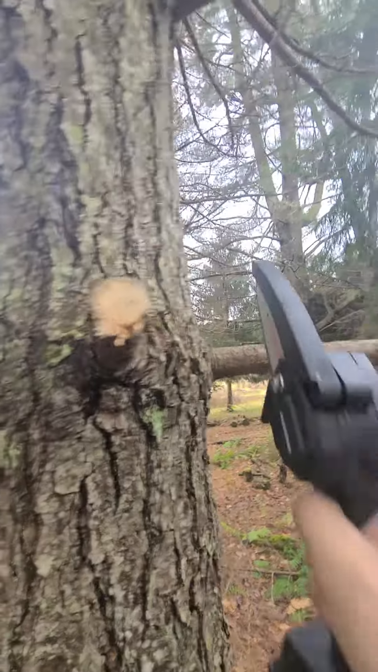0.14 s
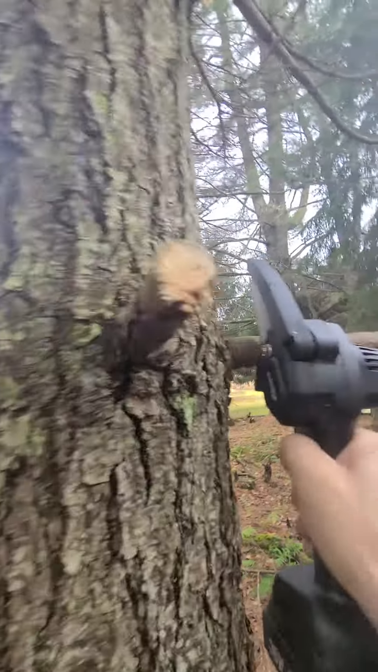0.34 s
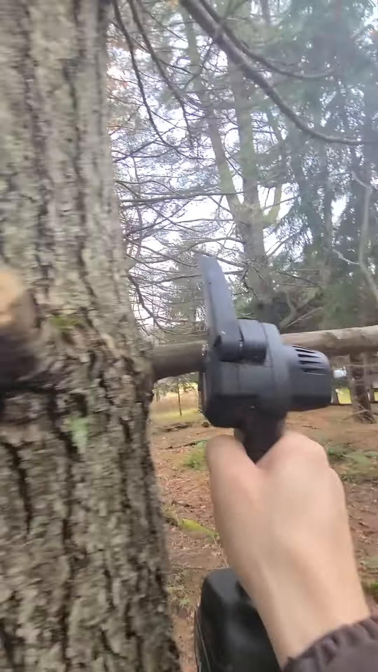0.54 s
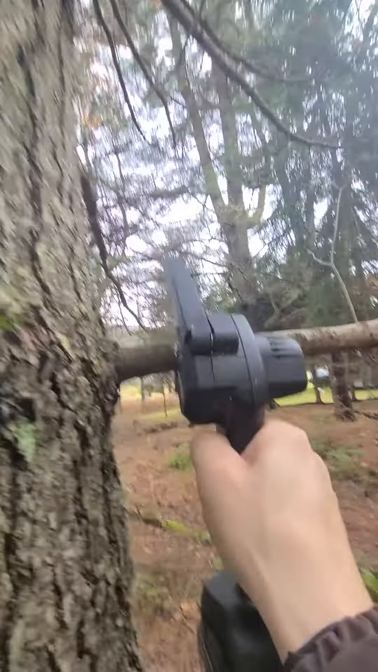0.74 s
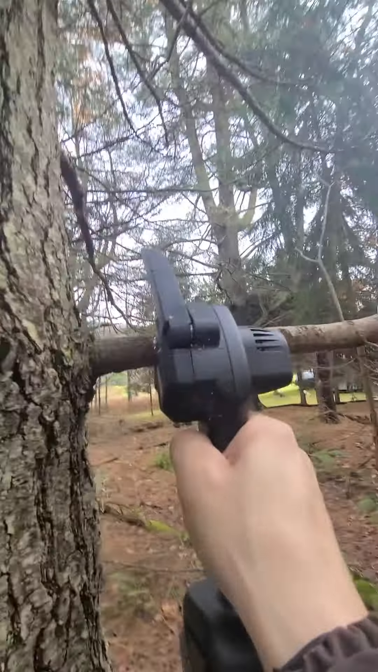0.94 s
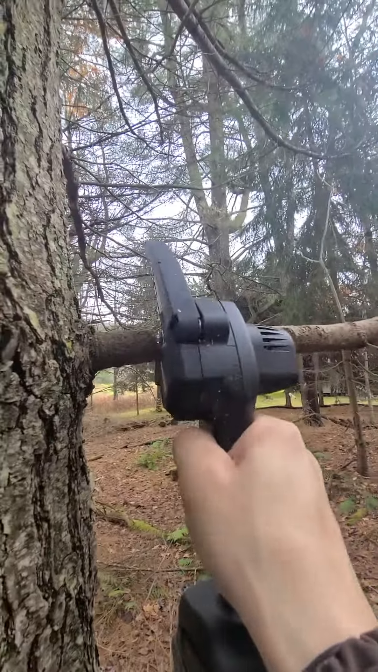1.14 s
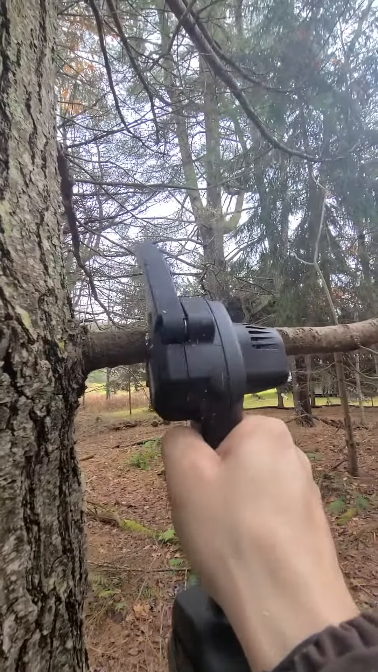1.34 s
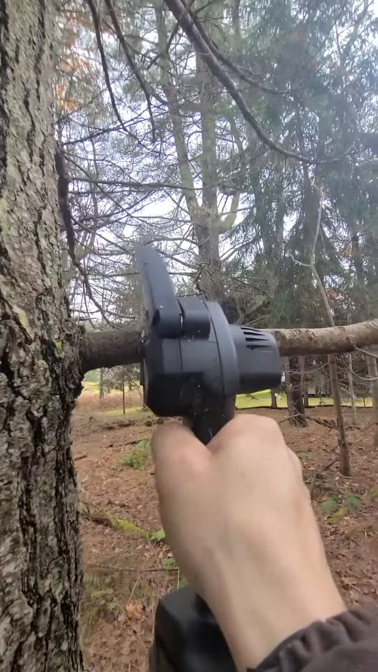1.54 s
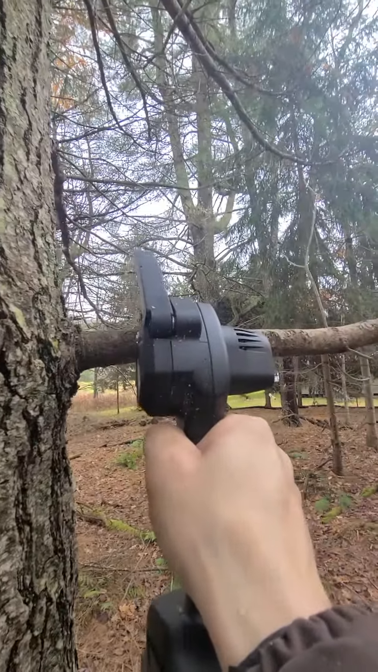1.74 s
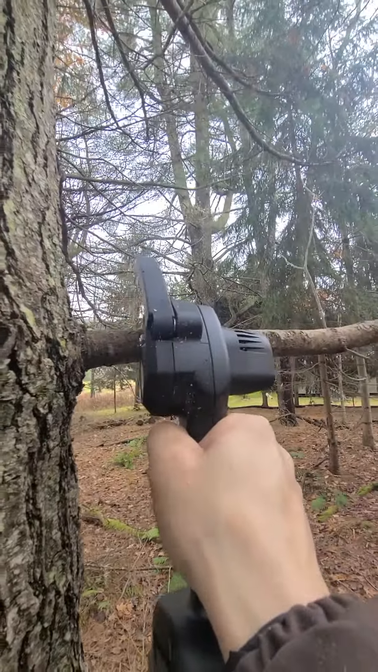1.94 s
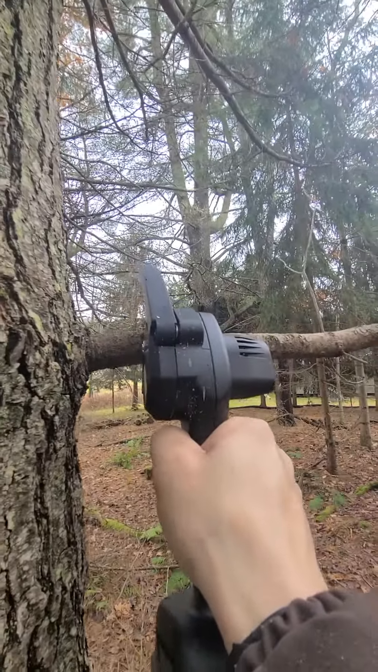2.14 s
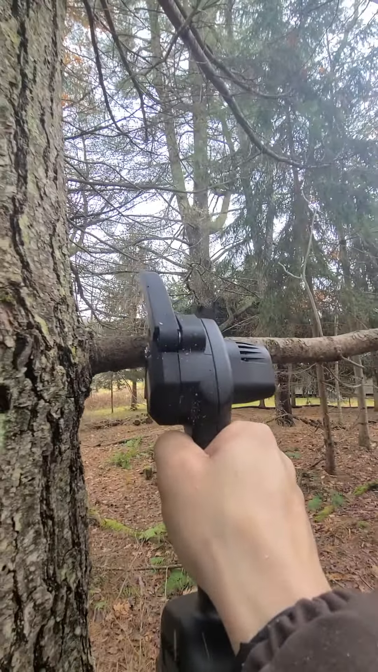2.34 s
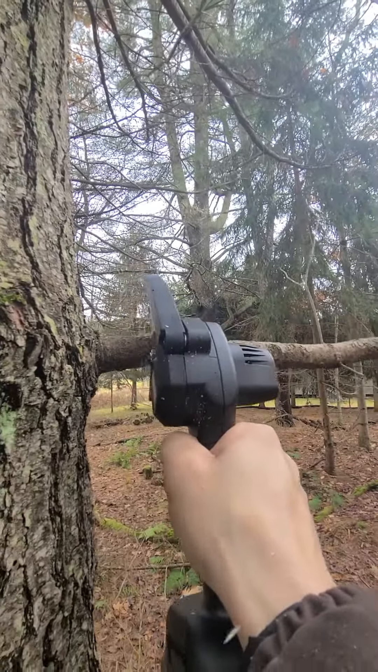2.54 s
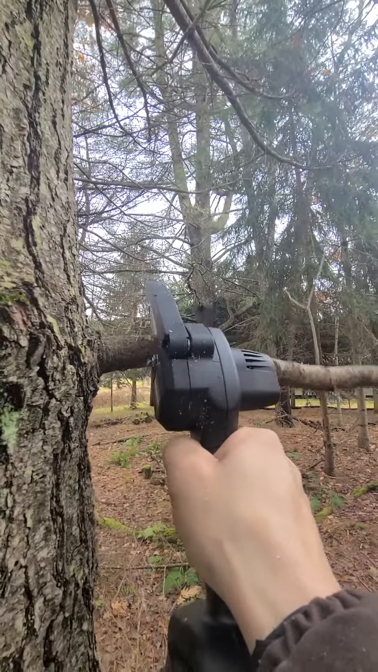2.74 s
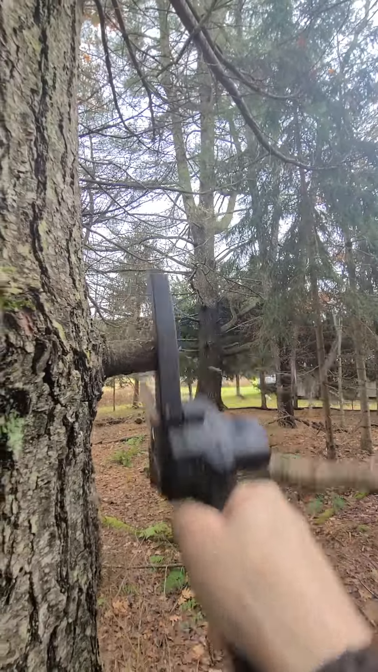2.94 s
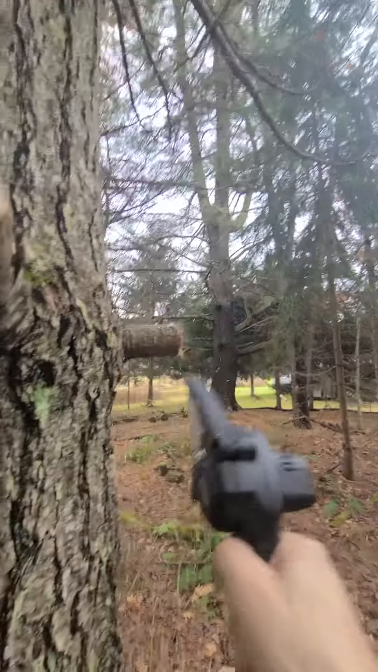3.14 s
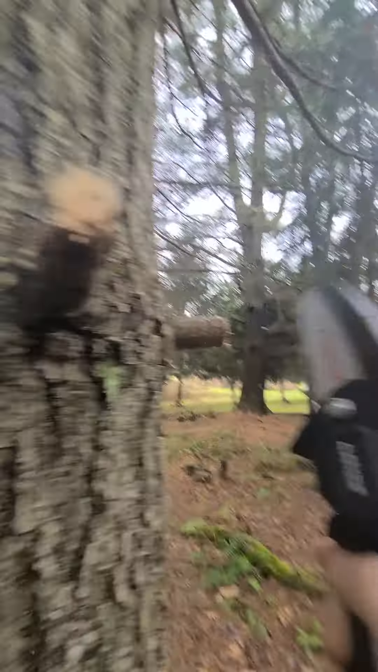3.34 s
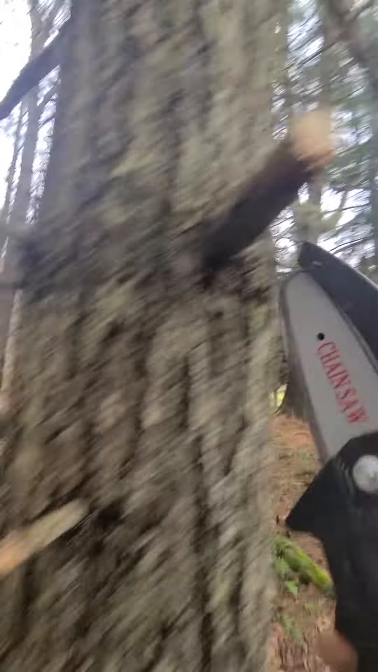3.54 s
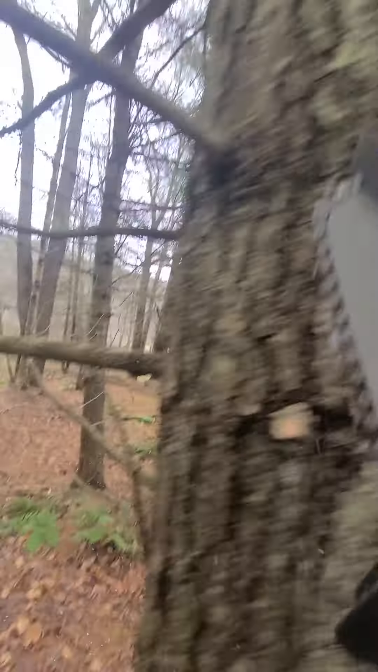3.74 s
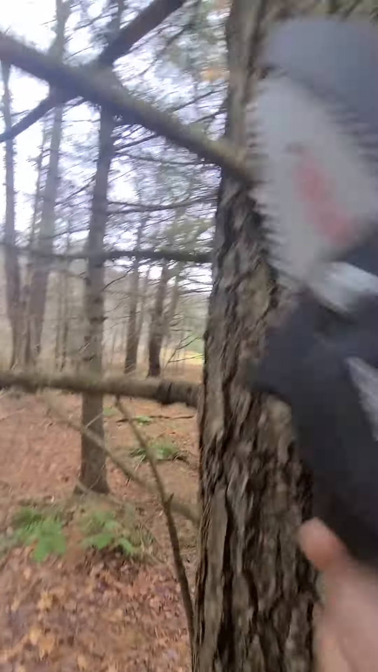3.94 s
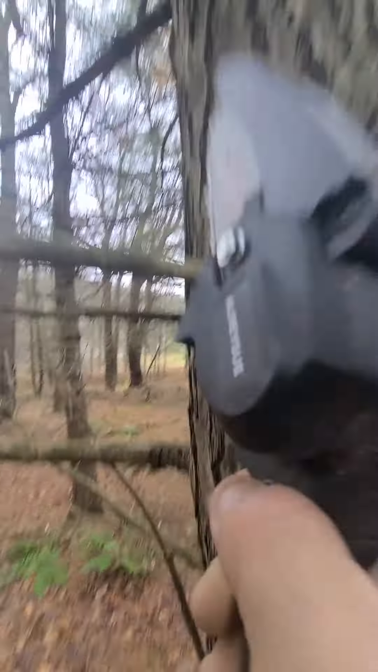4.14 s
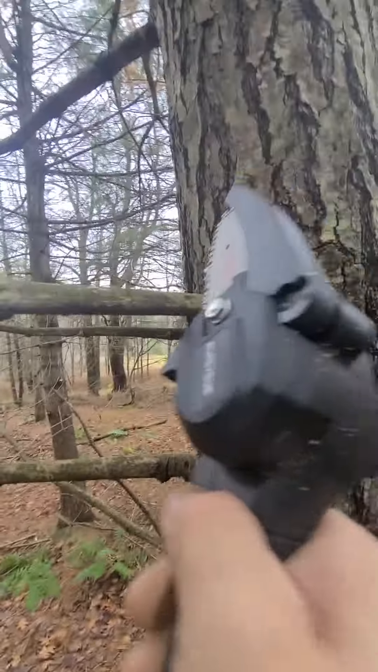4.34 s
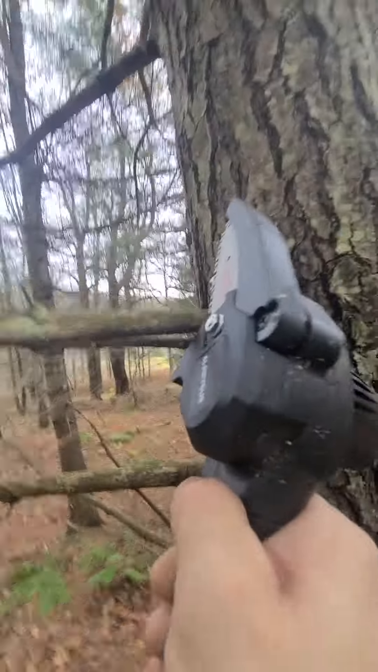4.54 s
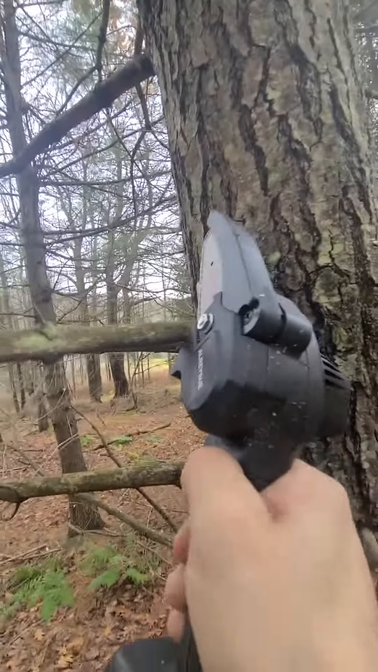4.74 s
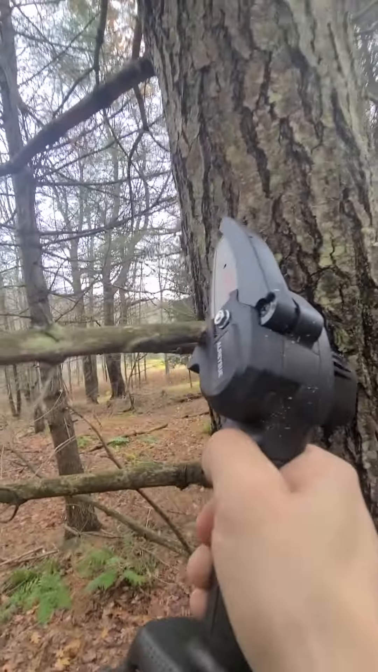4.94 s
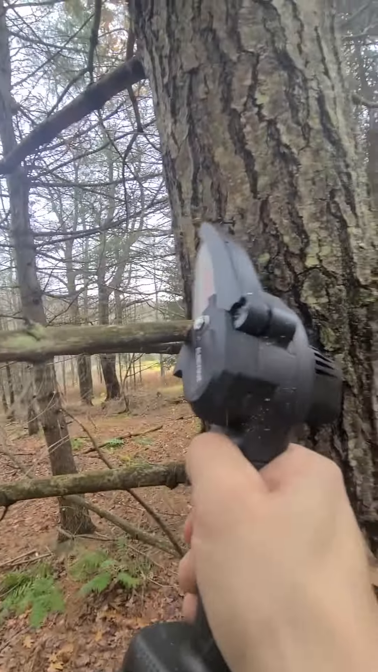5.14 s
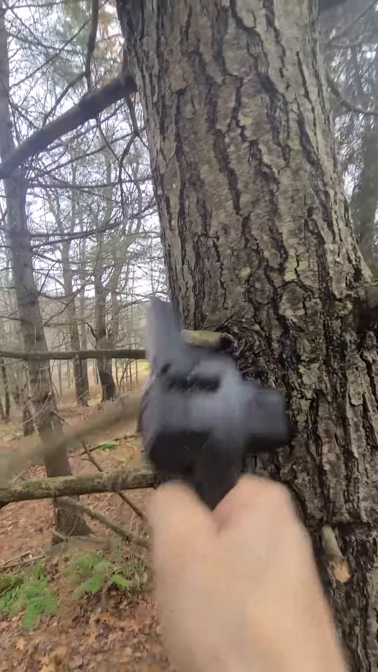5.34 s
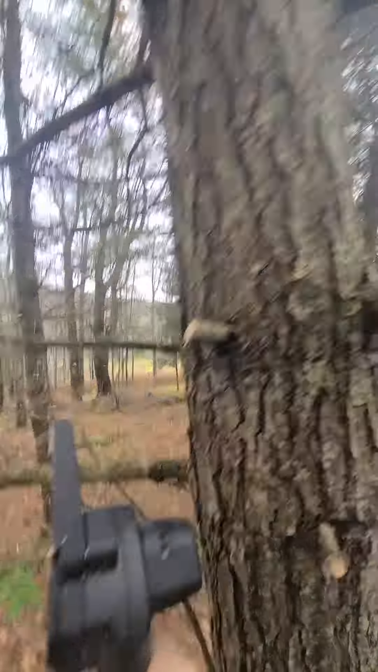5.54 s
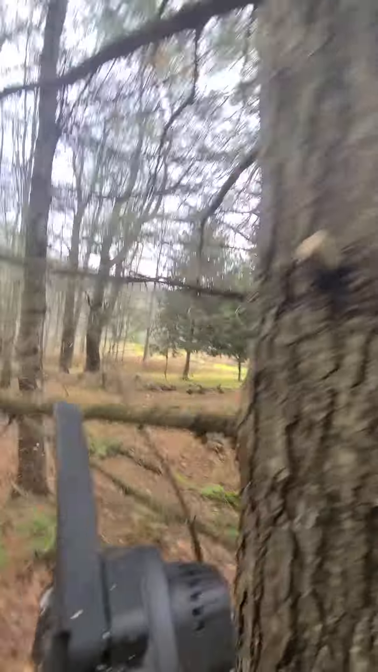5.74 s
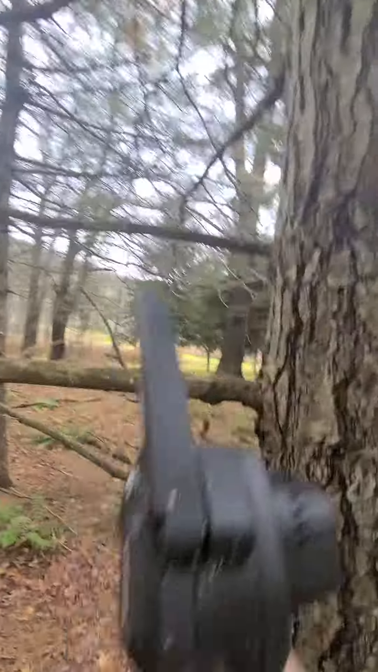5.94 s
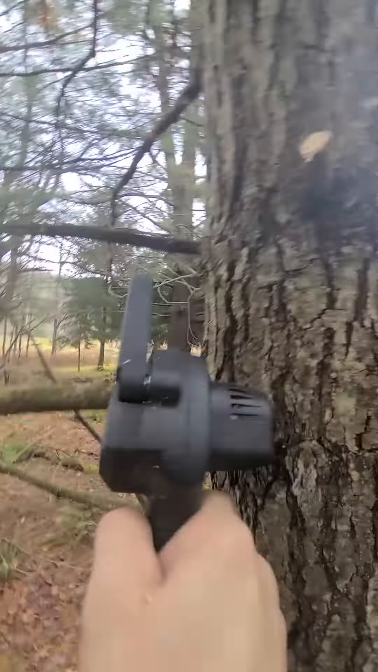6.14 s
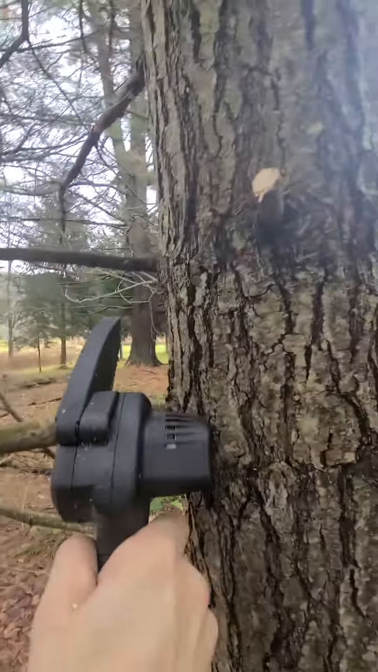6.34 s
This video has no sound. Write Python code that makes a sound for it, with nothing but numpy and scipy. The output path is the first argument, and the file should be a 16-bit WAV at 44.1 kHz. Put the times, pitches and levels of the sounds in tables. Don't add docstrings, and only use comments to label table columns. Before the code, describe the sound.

A small battery chainsaw buzzes harshly through a branch, whines down, cuts a second shorter one, then starts a third, in quiet woods.

```python
import sys
import numpy as np
from scipy import signal
from scipy.fft import rfft, irfft, next_fast_len
from scipy.io import wavfile
from scipy.ndimage import uniform_filter1d, map_coordinates

SR = 44100
rng = np.random.default_rng(int(sys.argv[2]) if len(sys.argv) > 2 else 0)


def amp(db):
    return 10 ** (np.asarray(db, float) / 20)


def write(x):
    x = np.atleast_2d(x).T
    wavfile.write(sys.argv[1], SR, np.round(np.clip(x, -1, 1) * 32767).astype(np.int16))


N = 286650

# [trigger t/s, branch parts t/s, trigger let go t/s, coasting time/s, chain stops t/s]
CUTS = [
    (1.07, 2.76, 2.878, .46, 3.545),
    (4.628, 5.165, 5.295, .5, 6.065),
    (6.31, 7, 7.1, .46, 7.2),
]
# [t/s, chain level/dB, bite level/dB, left-right/dB]
HAND = [
    [(1.07, -22.5, -19, -0.5), (1.25, -22, -18.5, 0), (1.29, -26, -23, -1), (1.4, -24, -18, -1),
     (2.5, -24.5, -20, -3), (2.74, -23.5, -18.5, -2.5), (2.84, -25.5, -29.5, -7), (3.33, -28, -29.5, -4.5),
     (3.542, -35, -38.5, -7.5)],
    [(4.628, -26, -27.5, -3.5), (4.665, -24.5, -27.5, -1), (4.695, -21, -14, -3), (4.725, -23, -20, -1.5),
     (5.148, -21.5, -19.5, -3), (5.166, -28, -24, -3), (5.3, -24.5, -28, -4.5), (5.58, -24.5, -33.5, -4.5),
     (5.78, -26.5, -35, -7.5), (6.055, -54.5, -37.5, 1), (6.08, -78, -60, -5)],
    [(6.323, -27, -30, 2), (6.37, -22.5, -22, -3), (6.5, -21.5, -15.5, -0.5)],
]
# [t/s, extra shake/dB]
KICKS = [
    (4.7, 11.5),
    (6.4, 3.5),
]
# [peak t/s, rise/s, fall/s per 10 dB, level/dB]
HOUSING_HUM = [
    (1.15, 0.033, 0.5, -46),
    (1.68, 0.4, 0.21, -40),
    (6.39, 0.022, -0.1, -26.5),
]
# [t/s, peak level/dB]
BITES = [(1.079, -12.5), (1.093, -15), (1.129, -0.5), (1.16, -1.5), (1.182, -13.5), (1.213, -5),
         (1.243, -9.5), (1.263, -11), (1.349, -7.5), (1.378, -8.5), (1.478, -8.5), (1.536, -11.5),
         (1.551, -4), (1.597, -1), (1.631, -9), (1.658, -12), (1.676, -11), (1.697, -12), (1.73, -2.5),
         (1.763, -9), (1.791, -2.5), (1.86, 1.5), (1.906, -25.5), (1.923, -20.5), (1.992, -6.5),
         (2.029, -20.5), (2.071, -13.5), (2.138, -5), (2.215, -2), (2.26, 3), (2.31, -6), (2.33, -15),
         (2.351, -12), (2.422, -7), (2.446, -9.5), (2.498, 1.5), (2.519, -15.5), (2.54, -15.5),
         (2.643, -3.5), (2.67, -4), (2.693, -4), (2.715, -1), (2.766, -10), (2.785, -10)]
# [t/s, peak level/dB]
LATER_BITES = [(4.638, -17), (4.658, -15), (4.685, -6.5), (4.724, -14), (4.752, -6), (4.797, -7),
               (4.87, -11.5), (4.913, -15.5), (4.929, -18), (4.961, -10.5), (4.987, -11), (5.083, -16),
               (5.116, -5.5), (6.325, -17.5), (6.34, -19), (6.369, 3), (6.42, -13), (6.448, -8)]
# [t/s, peak level/dB]
RATTLES = [(2.81, -11.5), (2.8664, -19.5), (2.9502, -12.5), (2.9854, -9), (3.0255, -8), (3.0844, -12.5),
           (3.1093, -13), (3.1274, -5), (3.1737, -9), (3.2146, -11), (3.2939, -18), (3.3398, -11.5),
           (3.3598, -13), (3.3874, -15.5), (3.4012, -15), (3.4204, -17), (3.4466, -14.5), (3.4634, -17),
           (3.5194, -22.5), (3.5349, -17.5), (5.1784, -14.5), (5.2254, -17), (5.2639, -4.5), (5.2864, -13),
           (5.3234, -20), (5.3477, -9.5), (5.4474, -24), (5.4914, -15.5), (5.5434, -7), (5.5812, -14.5),
           (5.6111, -16), (5.655, -9.5), (5.7024, -9.5), (5.7254, -19), (5.7653, -14), (5.7997, -10),
           (5.8586, -25), (5.8905, -18.5), (5.9374, -23.5), (5.9549, -25)]
# [in wood level/dB, out of wood level/dB]
CUT_LINK_DB = [(2.5, 0.5), (5, 1), (-0.5, 0)]
SWING = [(0, 7), (0, 13), (3, 3)]
# [f/Hz, first order level/dB, second order level/dB]
WHINE = [(158, -61, -43.5), (214, -45, -32), (269, -43, -29), (338, -49, -26.5), (397, -35, -34.5),
         (443, -38, -29.5), (473, -28.5, -28.5)]
WHINE_DB = [-1, -5.5, 0]

# [t/s, peak level/dB]
SLAPS = [(1.077, -13), (4.7984, -8), (1.0961, -11.5), (1.1291, -0.5), (1.549, -8.5), (1.696, -7.5),
         (2.3082, -11), (2.466, -8.5), (2.9905, -6), (3.1869, -7), (3.2157, -11), (3.249, -12),
         (3.2943, -9), (3.339, -13.5), (3.359, -9), (3.4044, -11), (3.4468, -14.5), (3.4706, -13),
         (3.518, -17), (4.686, -5), (5.347, -7), (5.56, -7), (5.655, -7), (5.7021, -6.5), (5.727, -12),
         (5.8001, -9.5), (5.8238, -15), (5.89, -9.5), (6.0173, -31), (6.075, -25), (6.325, -16),
         (6.367, -3.5), (6.4215, -3)]
# [t/s, peak level/dB, case knock level/dB, left-right/dB]
TAPS = [(0.239, -22, -11, -5), (0.264, -44.5, 5, 0.5), (0.3033, -37, -25, 6), (0.459, -35, -12, 3),
        (0.5133, -42, -6, -0.5), (0.615, -44, -4, 0), (1.032, -53, 16, -3.5), (1.0403, -42.5, 23.5, -6),
        (3.5592, -29.5, -2, -8), (3.621, -40.5, -10, -6), (3.722, -43.5, -10, 8), (3.848, -43.5, -6.5, -11),
        (3.8678, -21.5, -10.5, -5.5), (4.1395, -54, -18.5, -11), (4.2921, -30.5, -16, 6.5),
        (4.441, -52.5, -14.5, -3), (4.5529, -38, 3, -11), (4.575, -61, -15.5, 0), (5.9988, -42, -5.5, 0),
        (6.0383, -27.5, -1.5, -6), (6.1572, -22.5, -9, 4), (6.199, -32.5, -2, 2), (6.2242, -44, -8.5, 4.5),
        (6.2768, -48, 0.5, -3.5), (6.2953, -55, 12, -9.5)]
# [t/s, level/dB]
TICKS = [(.478, -66.5), (3.9, -61), (4.2913, -46.5), (4.441, -70), (4.485, -74), (5.825, -33), (5.999, -43),
         (6.027, -59), (6.041, -41), (6.053, -53), (6.065, -54), (6.076, -45), (6.1, -66), (6.163, -40),
         (6.2, -48), (6.212, -52.5), (6.2249, -49), (6.278, -56)]
# [t/s, peak level/dB, f/Hz, fade by 60 dB/s]
THUDS = [(0.43, -53, 520, .08), (.485, -43, 560, .06), (.525, -50, 570, .06), (.62, -45, 440, 0.09),
         (0.7, -43, 600, .07), (.241, -27.5, 168, 0.047), (3.54, -16.5, 456, 0.036), (.46, -44, 56, .08),
         (4.552, -29, 380, 0.029), (3.87, -47, 41, .1), (4.2, -30, 1800, .014), (6.158, -32, 1650, .016),
         (.24, -31, 1730, .012), (6.016, -29, 570, .04), (6.2, -37, 520, .04), (3.273, -17.5, 99.2, 0.066),
         (3.538, -11.5, 613, 0.042), (3.561, -32, 610, 0.027), (6.036, -33, 110.5, 0.074)]
# [f/Hz, level/dB, fade by 60 dB/s]
CASE_RING = [(414, 4, 0.05), (502, 3.5, 0.027), (595.4, 8.5, 0.034), (695, 5, 0.025)]

# [peak t/s, rise/s, fall/s per 10 dB, level/dB]
CREAK = [
    (.65, 0.025, .14, -59),
    (.78, 0.07, .06, -62),
]
# [peak t/s, rise/s, fall/s per 10 dB, level/dB]
NEEDLES = [
    (.1, .2, .1, -62.5),
    (.4, .1, .06, -69),
]
# [peak t/s, rise/s, fall/s per 10 dB, swish level/dB, bump level/dB]
SLEEVE = [
    (3.59, 0.017, 0.13, -52.5, -57.5),
    (3.725, 0.144, 0.05, -55.5, -63.5),
    (3.88, 0.03, 0.015, -66, -52),
    (4.0, .3, .3, -69, -69),
    (6.13, 0.032, 0.28, -57.5, -53.5),
    (6.22, 0.025, 0.31, -58.5, -54),
]
# [peak t/s, rise/s, fall/s per 10 dB, swish level/dB, bump level/dB]
REACH = [
    (4.285, 0.082, 0.076, -51.5, -55),
    (4.3, 0.011, 0.034, -59, -39),
    (4.365, 0.021, 0.05, -69, -42),
]

# [f/Hz, level/dB per Hz]
THICK_WOOD = [(190, -29), (330, -18), (398, -1.5), (555, 2), (992, -10), (1320, -4.5), (1520, -5),
              (1760, -5), (2000, -13), (2600, -36), (4400, -120)]
# [f/Hz, level/dB per Hz]
THIN_WOOD = [(190, -21.5), (310, -20.5), (430, 3.5), (580, -2.5), (992, -4.5), (1500, -5.5), (1900, -7),
             (2100, -13), (2550, -5.5), (3000, -8), (4000, -18.5), (5200, -30)]
# [f/Hz, level/dB per Hz]
FREE_CASE = [(180, -31), (250, -12), (340, -13.5), (430, 1), (520, -4), (640, 2.5), (760, -5.5),
             (1000, -11.5), (1400, -7), (2000, -10.5), (2600, -35)]
# [f/Hz, level/dB per Hz]
LINKS = [(760, -50.5), (1300, -6), (1560, -3.5), (1880, 0.5), (2170, -4.5), (2560, 0.5), (4470, -11),
         (5000, -15), (6500, -43), (11000, -120)]
# [f/Hz, level/dB per Hz]
FREE_LINKS = [(600, -32), (1100, -23), (1320, -4), (1560, -6), (1850, 2.5), (2100, -4), (2300, 0),
              (2600, -6), (3220, -2), (4470, -10.5), (6500, -45)]
# [f/Hz, level/dB per Hz]
TURNED_LINKS = [(600, -32), (1100, -13.5), (1320, -6), (1600, -7), (1930, 0), (2200, -4.5), (2510, -2.5),
                (2900, -1.5), (3500, -2.5), (4470, -12.5), (6500, -25)]
# [f/Hz, level/dB per Hz]
CHAIN_HISS = [(2470, -20), (4200, -12), (5210, -6), (6450, 0.5), (7730, -5.5), (9000, -3), (9800, -2.5),
              (12100, -1.5), (15100, 1), (15700, 5), (16200, -15)]
# [f/Hz, level/dB per Hz]
SHAKE = [(18, -42), (30, -14), (49, -4), (81, 0), (216, 2.5), (319, -2.5), (350, 0), (460, -34),
         (770, -120)]
# [f/Hz, level/dB per Hz]
CRACK = [(530, -19), (900, -12.5), (2340, 1.5), (2980, -7), (3320, -1), (5260, -18), (12000, -22.5),
         (16200, -19)]
# [f/Hz, level/dB per Hz]
AIR = [(18, -47), (30, -23), (80, -0.5), (113, -16), (236, -10), (684, -12), (1030, -14.5), (1500, -21),
       (1950, -59), (3300, -120)]
# [f/Hz, level/dB per Hz]
LEAVES = [(600, -42), (1100, -1.5), (2000, -5), (2700, -9), (3300, -9.5), (5000, -21.5), (6500, -16.5),
          (7500, -30.5), (12000, -38.5), (16000, -48)]
# [f/Hz, level/dB per Hz]
RUSTLE = [(710, -43), (1200, -8), (1680, 4), (3150, 0), (6510, -3), (8350, -13.5), (14800, -7.5),
          (16000, -8)]
# [f/Hz, level/dB per Hz]
BUMP = [(29, -30), (50, 2.5), (230, -12.5), (302, -8.5), (522, -13.5), (796, -13), (1300, -19.5),
        (1690, -37), (2860, -120)]
# [f/Hz, level/dB per Hz]
SELF_NOISE = [(3000, -40), (7000, -5.5), (9000, -6), (11500, 2.5), (16000, -0.5)]

# [f/Hz, lead/radians]
LEAD = [(0, 0), (690, -0.9), (1550, 1.8), (2840, 3.3), (4480, 3.1), (5770, 6.6), (8350, 3.4), (9220, 5.0),
        (10100, 1.9), (10500, 6.4), (11700, 9.5), (13100, 3.5), (14000, 4.3), (16500, 6.5)]
# [f/Hz, left-right/dB]
LEAN = [(60, -4), (110, -3.5), (200, -9.5), (380, -6), (700, -5), (1290, -9), (2380, -6), (4400, 6.5),
        (8120, 6.5), (15000, -3.5)]
# [f/Hz, likeness -1 to 1]
ALIKE = [(40, .55), (100, .68), (350, .97), (700, .92), (1400, .8), (3000, .62), (6000, .3), (12000, .3)]
# [f/Hz, likeness -1 to 1]
DIFFUSE = [(60, 0.46), (240, 0.93), (950, -0.12), (3770, 0.12), (15000, -0.018)]
# [f/Hz, fade by 60 dB/s]
TREES = [(200, 0.33), (2000, 0.207), (10000, 0.026)]

FREE_HZ = 468
BUILD_S, BUILD_DB = .008, 36


def unit(x):
    return x / np.sqrt(np.mean(x ** 2) + 1e-20)


def noise():
    return rng.standard_normal((2, N))


def since(s):
    return np.clip(np.arange(N) / SR - s, 0, None)


def along(points, hz):
    f, value = np.transpose(points)
    return np.interp(np.log(hz + 1), np.log(f + 1), value)


def curves(spans):
    t = np.arange(N) / SR
    s, *columns = np.transpose(np.concatenate(spans))
    on = sum((t >= span[0][0]) & (t <= span[-1][0]) for span in spans)
    return [np.interp(t, s, column) for column in columns], uniform_filter1d(on * 1., size=400)


def wobble(rate):
    knots = rng.standard_normal(int(N * rate / SR) + 4)
    return map_coordinates(knots, [np.arange(N) * rate / SR])


def swells(rows):
    t = np.arange(N) / SR
    total = 0
    for s, rise, fall, *db in rows:
        slope = np.where(t < s, abs(rise), abs(fall))
        total = total + amp(np.array(db)[:, None] - 10 * np.abs(t - s) / slope)
    return total


def per_cut(values):
    return np.asarray(values)[sum(since(cut[0] - .02) > 0 for cut in CUTS[1:])]


def filtered(x, response):
    m = next_fast_len(x.shape[-1] + 2048)
    return irfft(rfft(x, m) * response(np.fft.rfftfreq(m, 1 / SR)), m)[..., :x.shape[-1]]


def resonance(hz, width):
    def response(f):
        return (1j * f * width / (hz ** 2 - f * f + 1j * f * width)) ** 2
    return unit(filtered(rng.standard_normal(N), response))


def ports(pair, spectrum, alike=ALIKE, near=1):
    def colour(hz):
        turn = np.arccos(np.clip(along(alike, hz), -1, 1)) / 2
        return amp(along(spectrum, hz)) * [np.cos(turn), np.sin(turn)]

    def skew(hz):
        lean = along(LEAN, hz) * np.log(10) / 20
        return np.exp(np.outer([.5, -.5], near * (1j * along(LEAD, hz) + lean)))

    mid, side = filtered(pair, colour)
    both = filtered(np.array([mid + side, mid - side]), skew)
    return both / np.sqrt(np.mean(both.mean(0) ** 2))


def by_stretch(pair, moments, spectra):
    parts = np.split(pair, [round(s * SR) for s in moments], axis=1)
    return np.hstack([ports(part, spectrum) for part, spectrum in zip(parts, spectra)])


def woods():
    hush_db = 0
    for cut in CUTS:
        hush_db = hush_db - 9 * (since(cut[4]) > 0) * np.exp(-since(cut[4]) / 0.5)
    air_db = -59 + hush_db + 1.3 * wobble(11.0)
    gust_db = 6 * np.exp(-since(0) / .25)
    leaf_db = -66.5 + hush_db + gust_db + 1.2 * wobble(8.2)
    air = amp(air_db) * ports(noise(), AIR, DIFFUSE, near=0)
    leaves = amp(leaf_db) * ports(noise(), LEAVES, DIFFUSE, near=0)
    hiss = amp(-81.5) * ports(noise(), SELF_NOISE, DIFFUSE, near=0)
    creak = swells(CREAK) * amp(2.0 * wobble(30)) * resonance(hz=1040, width=380)
    needles = swells(NEEDLES) * resonance(hz=2500, width=700)
    return air + leaves + hiss + creak + needles


def trees(x):
    hz, t, z = signal.stft(rng.standard_normal((2, SR // 3)), SR, nperseg=256)
    fading = amp(-60 * t / along(TREES, hz)[:, None])
    tail = signal.istft(z * fading, SR, nperseg=256)[1]
    late = np.pad(x, ((0, 0), (300, 0)))
    return signal.fftconvolve(late, tail / np.linalg.norm(tail[0]), axes=1)[:, :N]


def sleeve():
    arm_stops = amp(-60 * since(4.376) / .03)
    swish_gain, bump_gain = swells(SLEEVE) + swells(REACH) * arm_stops
    grains = amp(0.8 * wobble(48) + 1.6 * wobble(220)) * noise()
    swish = swish_gain * ports(grains, RUSTLE, DIFFUSE, near=0)
    bump = bump_gain * amp(2.0 * wobble(50)) * ports(noise(), BUMP, DIFFUSE, near=0)
    return (swish + bump) * amp([[-2.5], [2.5]])


def knock(t, db, case_db, thud_db, t60):
    rise = amp(-BUILD_DB * np.clip(1 - t / BUILD_S, 0, 1))
    after = np.maximum(t - BUILD_S, 0)
    burst = rise * amp(-60 * after / np.clip(t60, .007, .06)) * rng.standard_normal((2, len(t)))
    crack = ports(burst, CRACK)
    ring, thud = 0, 0
    for hz, level, fade in CASE_RING:
        gain = amp(level + rng.normal(0, 4.4) - 60 * after / fade)
        ring = ring + gain * np.sin(2 * np.pi * hz * rng.normal(1, 0.037) * t)
    for hz, fade in [(90, 0.042), (160, 0.062)]:
        thud = thud + amp(-60 * after / fade) * np.sin(2 * np.pi * hz * rng.normal(1, 0.24) * t)
    body = rise * (amp(case_db - 10.0) * ring + amp(thud_db + 2.0) * thud)
    return amp(db) * (crack / np.abs(crack.mean(0)).max() + body)


def blows(free):
    out = np.zeros((2, N + SR))
    t = np.arange(SR // 10) / SR

    def start(s):
        return round((s - .0062) * SR)

    def add(s, sound):
        out[:, start(s):][:, :len(t)] += sound

    for s, db, case_db, pan_db in TAPS:
        t60 = np.interp(db, [-45, -20], [0.015, 0.016])
        add(s, knock(t, db, case_db, thud_db=-18.5, t60=t60) * amp([[pan_db / 2], [-pan_db / 2]]))
    for s, db in SLAPS:
        case_db = -9.5 - 11.5 * free[start(s)]
        add(s, knock(t, db - 3.5, case_db, thud_db=-48.5, t60=0.02))
    for s, db in TICKS:
        slope = np.where(t < BUILD_S, BUILD_DB / BUILD_S, -60 / 0.01)
        tick = ports(rng.standard_normal((2, len(t))), CHAIN_HISS)
        add(s, amp(db + 9.5) * tick * amp(slope * (t - BUILD_S)))
    for s, db, hz, t60 in THUDS:
        soft_start = 1 - np.exp(-t / 0.00327)
        add(s + .003, amp(db - 60 * t / t60) * np.sin(2 * np.pi * hz * t) * soft_start)
    return out[:, :N]


def shaft():
    loaded_hz, spin_up_s, coast_shape = 410, .045, 1.3
    hz, free = np.zeros(N), np.zeros(N)
    for start, parts, let_go, coast, stop in CUTS:
        out = np.sin(np.pi / 2 * np.clip(since(parts) / (let_go - parts), 0, 1))
        driven = loaded_hz * (1 - np.exp(-since(start) / spin_up_s) / 2) + (FREE_HZ - loaded_hz) * out
        coasting = np.exp(-(since(let_go) / coast) ** coast_shape)
        now = since(start - .01) > 0
        hz = np.where(now, driven * coasting, hz)
        free = np.where(now, (since(parts) > 0) & (since(stop) == 0), free)
    return np.maximum(hz, 125), uniform_filter1d(free, size=1500)


def motor(hz, free):
    speed, *orders = np.transpose(WHINE)
    first_db, second_db = (np.interp(hz, speed, db, left=-90) for db in orders)
    phase = 2 * np.pi * np.cumsum(hz * (1 + .014 * wobble(70))) / SR
    odd, even = amp(4.5 * np.array([wobble(30), wobble(30)]) - 3)
    tone = amp(first_db + 2.5) * odd * np.sin(phase)
    tone += amp(second_db + 2.5) * even * np.sin(2 * phase)
    tone += amp(second_db - 6) * odd * np.sin(3 * phase)
    tone += amp(first_db - 3) * even * np.sin(4 * phase)
    return free * amp(per_cut(WHINE_DB)) * tone * amp([[-2.2], [1.8]])


def impacts(hz, per_turn, jitter, spread_db):
    draw = rng.standard_normal((4000, 2))
    turns = np.cumsum(hz) / SR
    at = np.searchsorted(turns * per_turn, np.arange(len(draw)) + jitter * draw[:, 0])
    return np.bincount(at, amp(spread_db * draw[:, 1]), N + 1)[:N]


def passing(hits, width):
    t = np.arange(-1024, 1025) / SR
    bump = np.exp(-np.abs(t) / np.where(t < 0, .6 * width, width))
    shape = signal.fftconvolve(hits, bump, "same")
    return shape / (uniform_filter1d(shape, size=6000) + 1e-9)


def digs(rows, db):
    lag_s, width_s = 0.0026, 0.0032
    s, peak_db = np.transpose(rows)
    hits = np.bincount(np.round((s + lag_s) * SR).astype(int), amp(peak_db + db), N)[:N]
    t = np.arange(-1024, 1025) / SR
    return signal.fftconvolve(hits, np.exp(-(t / width_s) ** 2), "same")


def swung(pair, free):
    lag = per_cut(SWING)
    late = np.arange(N) - np.round(lag[:, 0] + free * (lag[:, 1] - lag[:, 0])).astype(int)
    return np.array([pair[0, late], pair[1]])


def patchy(pair):
    z = signal.stft(pair, nperseg=512)[2]
    field = uniform_filter1d(rng.standard_normal(z.shape[1:]), size=6, axis=0)
    field = uniform_filter1d(field, size=14, axis=1)
    return signal.istft(z * amp(1.5 * unit(field)), nperseg=512)[1][:, :N]


def handle_shake_db(hz, free, chain_db, bite_db):
    wood_db = -40 + 0.7 * (bite_db + 19)
    for s, db in KICKS:
        wood_db = wood_db + (since(s) > 0) * db * np.exp(-since(s) / 0.26)
    free_db = -52.5 + .5 * (chain_db + 23.0) - 18.5 * (hz / FREE_HZ) ** 2
    return wood_db + free * (free_db - wood_db)


def links_level_db(free, chain_db, running):
    in_wood_db, out_db = per_cut(CUT_LINK_DB).T
    snatch_db = 8.5 * np.exp(-np.abs(running - 0.0244) / 0.036)
    return -30 + 0.59 * (chain_db + 25) + (1 - free) * in_wood_db + free * out_db + snatch_db


def saw(hz, free):
    (chain_db, bite_db, pan_db), on = curves(HAND)
    running = since(0) - per_cut([cut[0] for cut in CUTS])

    def waking(attack_s):
        return -21.5 * np.exp(-np.maximum(running, 0) / attack_s)

    chain_wakes = waking(0.018)
    shake_db = handle_shake_db(hz, free, chain_db, bite_db)
    link_db = links_level_db(free, chain_db, running) + chain_wakes
    dug = (1 - free) * digs(list(BITES) + list(LATER_BITES), db=10.5) * amp(-21.5 - bite_db)
    dug += free * digs(RATTLES, db=-4) * amp(-chain_db - 10)
    hiss_db = chain_db + chain_wakes
    bite_db = bite_db + waking(0.0061)

    cutters = passing(impacts(hz, per_turn=.2, jitter=.25, spread_db=1.5), width=.0035)
    cutters = np.abs(cutters) ** (hz / 450)
    cutters = cutters * (free * 0.66 + (1 - free) * 0.55)
    chips = impacts(hz, per_turn=1.6, jitter=.5, spread_db=3.2)
    grit = passing(chips, width=0.00096)

    def grind(steady, sharp, feels=0.64):
        scrape = unit((steady + grit) * noise())
        chipping = unit(chips * np.sign(noise()))
        return (steady + cutters + feels * dug) * (scrape + sharp * chipping)

    turns = [CUTS[0][1], CUTS[1][0] - .05, CUTS[1][1], CUTS[2][0] - .05]
    wood_colours = [THICK_WOOD, FREE_CASE, THIN_WOOD, FREE_CASE, THICK_WOOD]
    link_colours = [LINKS, FREE_LINKS, LINKS, TURNED_LINKS, LINKS]
    wood = by_stretch(grind(steady=1.3, sharp=.5, feels=1), turns, wood_colours)
    chain = by_stretch(grind(steady=2.0, sharp=0.052), turns, link_colours)
    bite = amp(bite_db + 1.1 * wobble(30)) * wood
    links = amp(link_db + 0.93 * wobble(40)) * chain
    hiss = amp(hiss_db + 0.53 * wobble(25)) * ports(grind(steady=2.3, sharp=0.2), CHAIN_HISS)
    shake = amp(shake_db + 2 * wobble(12)) * ports(grind(steady=2.2, sharp=.3), SHAKE)
    housing = swells(HOUSING_HUM) * resonance(hz=51.8, width=35) * amp([[-3], [3]])
    pan = amp(np.outer([.5, -.5], pan_db + 3.5))
    return on * (swung(bite + patchy(links + hiss) + shake, free) * pan + housing)


def scene():
    hz, free = shaft()
    near = saw(hz, free) + motor(hz, free) + blows(free)
    return woods() + amp(-26) * trees(near) + sleeve() + near


def roll_off(x):
    return signal.sosfilt(signal.butter(12, 16890, fs=SR, output="sos"), x)


def record(dry):
    sound = filtered(dry, lambda hz: amp(-np.clip((hz - 15900) * .25, 0, 60)))
    sound = sound / (1 + np.abs(sound / .89) ** 8) ** (1 / 8)
    return roll_off(sound)


dry = scene()
out = record(dry)
write(out)
```